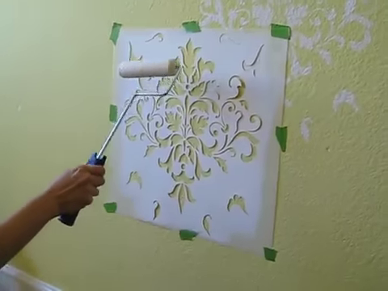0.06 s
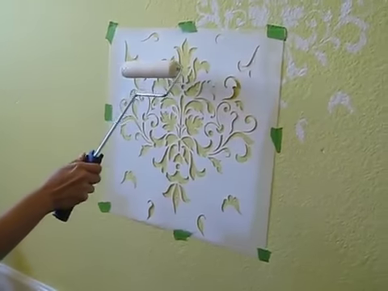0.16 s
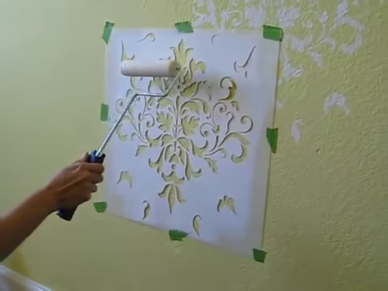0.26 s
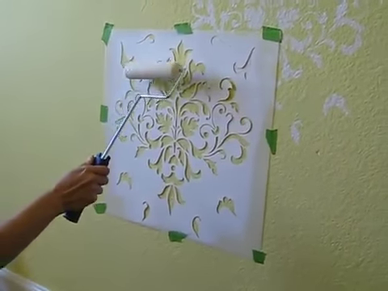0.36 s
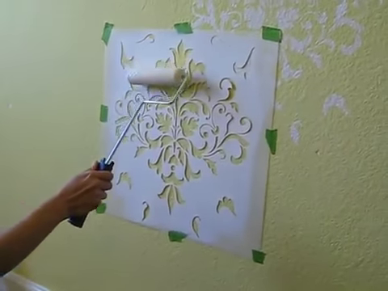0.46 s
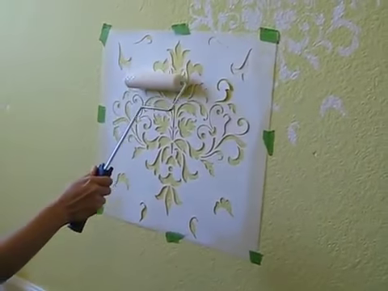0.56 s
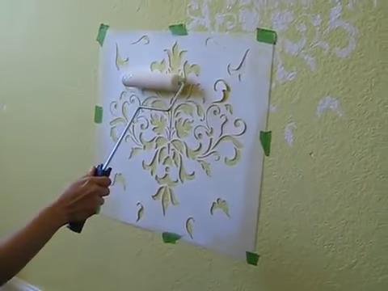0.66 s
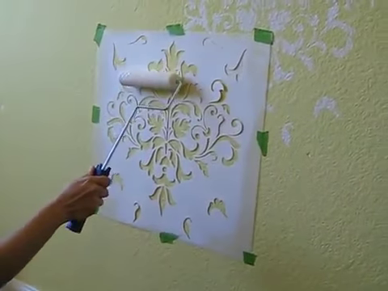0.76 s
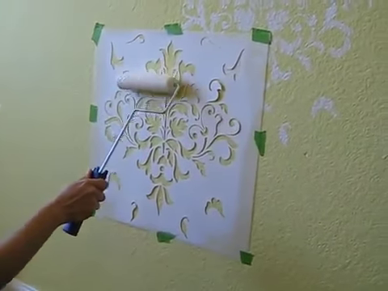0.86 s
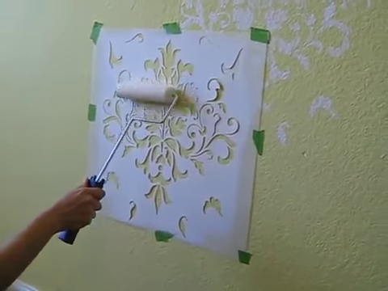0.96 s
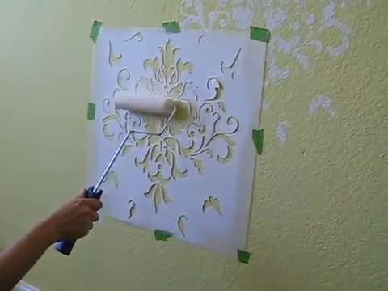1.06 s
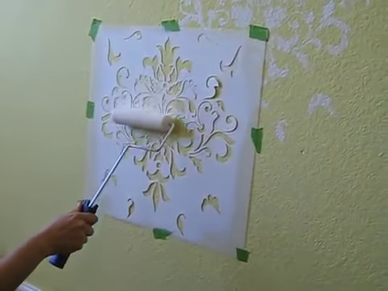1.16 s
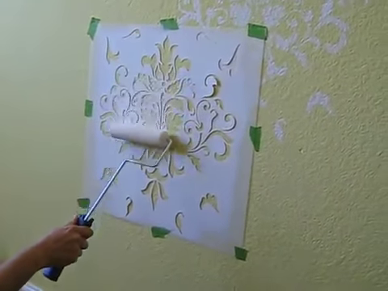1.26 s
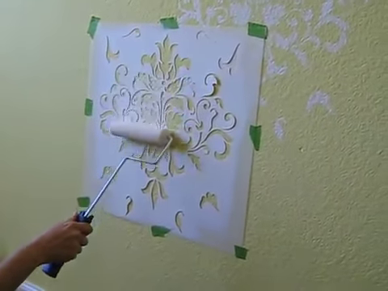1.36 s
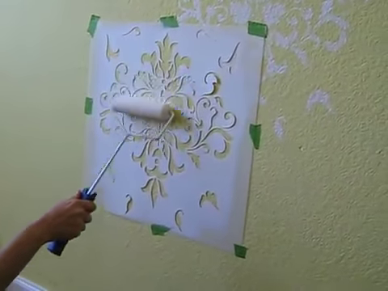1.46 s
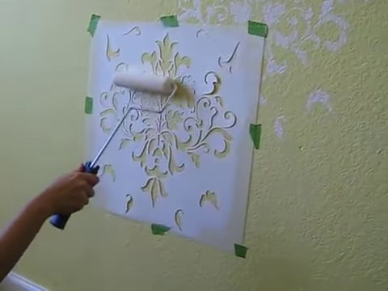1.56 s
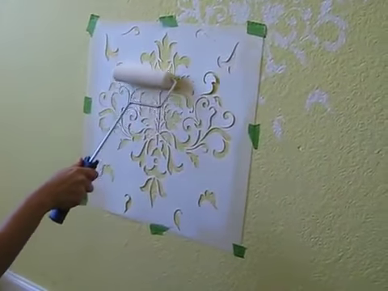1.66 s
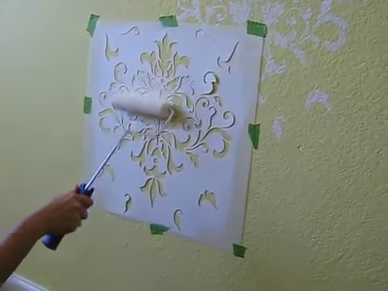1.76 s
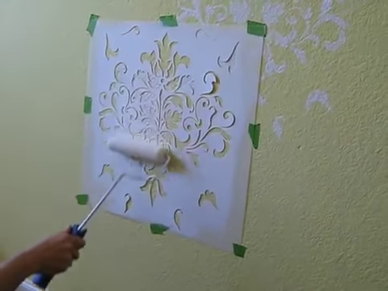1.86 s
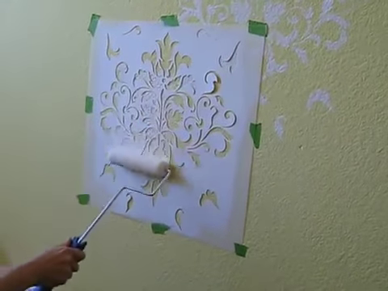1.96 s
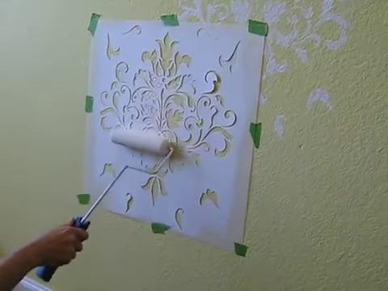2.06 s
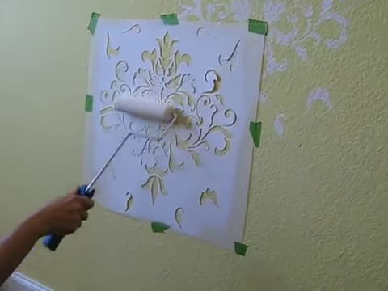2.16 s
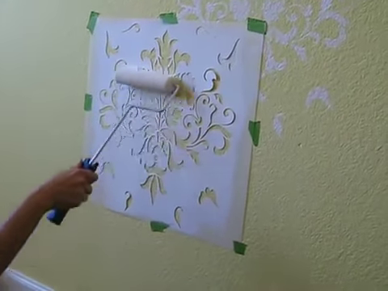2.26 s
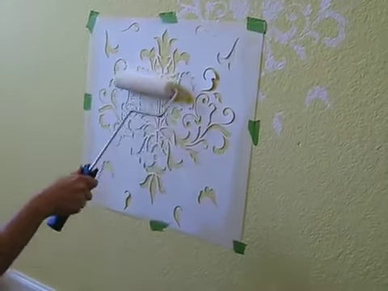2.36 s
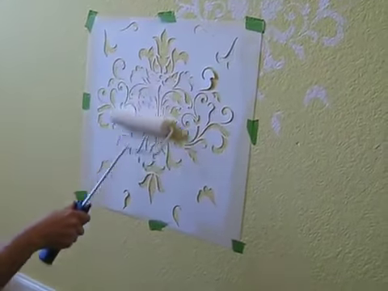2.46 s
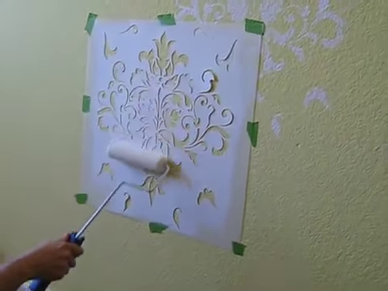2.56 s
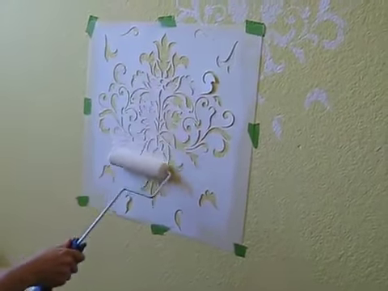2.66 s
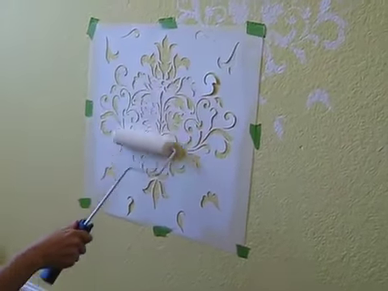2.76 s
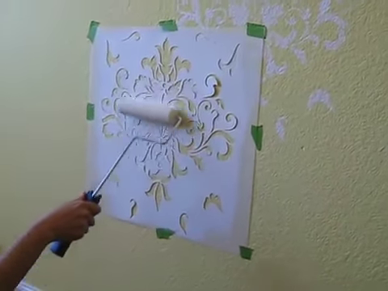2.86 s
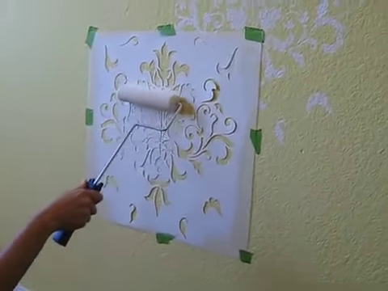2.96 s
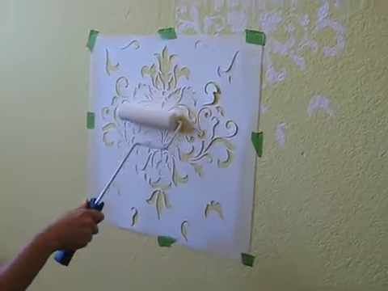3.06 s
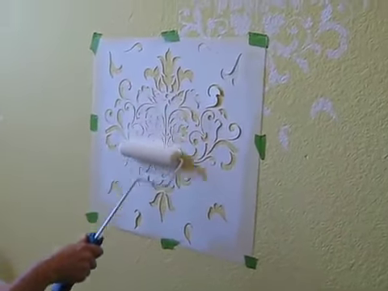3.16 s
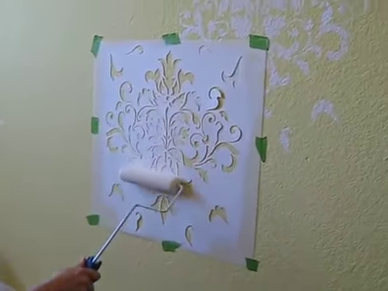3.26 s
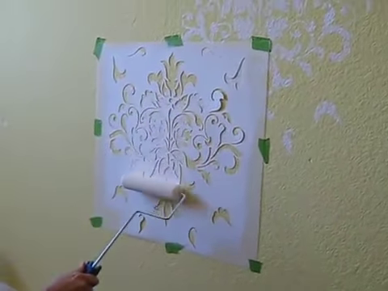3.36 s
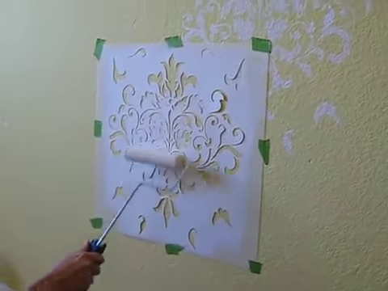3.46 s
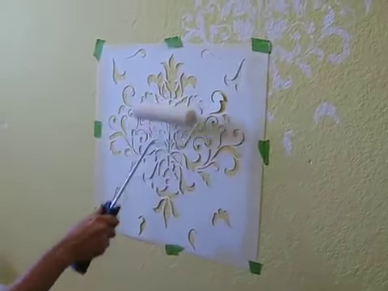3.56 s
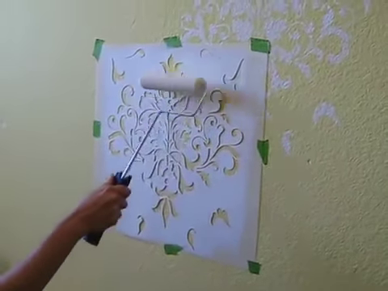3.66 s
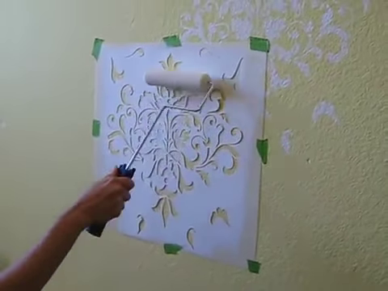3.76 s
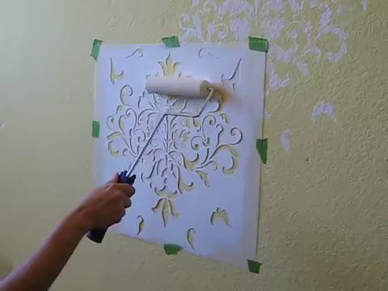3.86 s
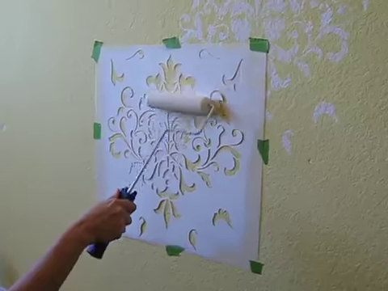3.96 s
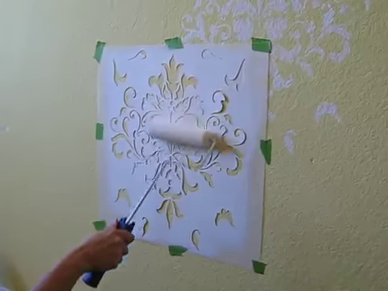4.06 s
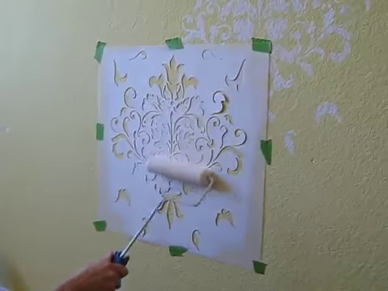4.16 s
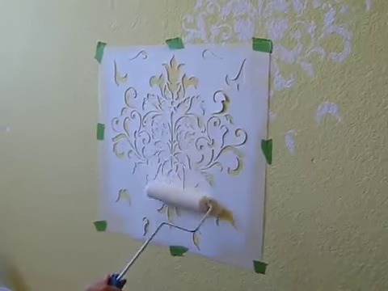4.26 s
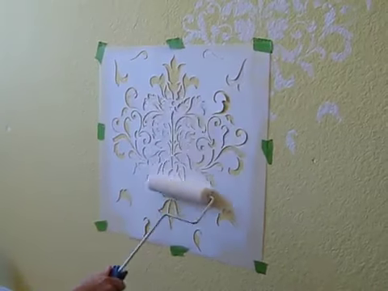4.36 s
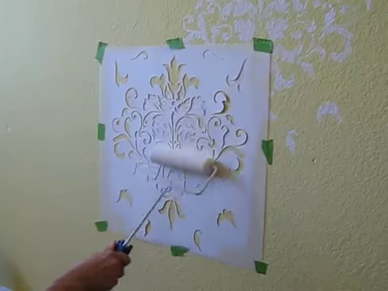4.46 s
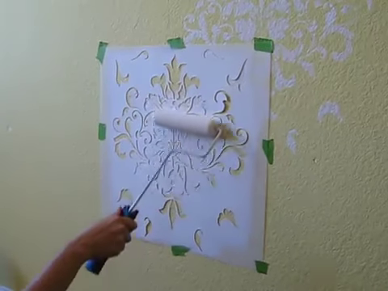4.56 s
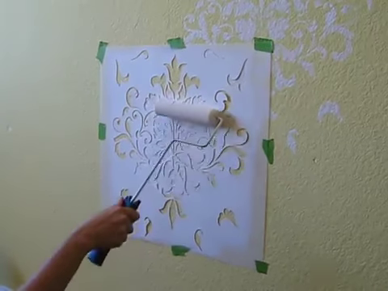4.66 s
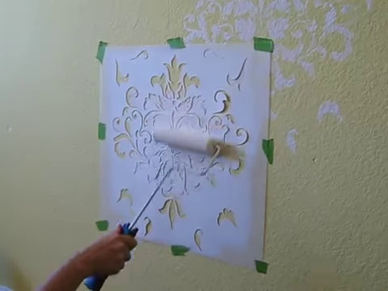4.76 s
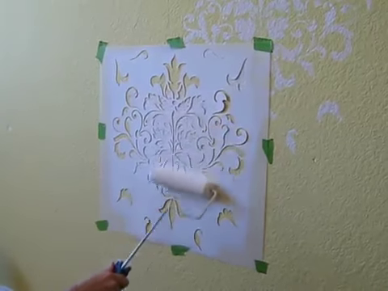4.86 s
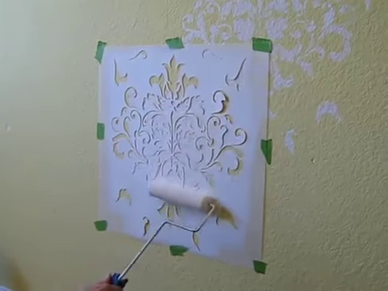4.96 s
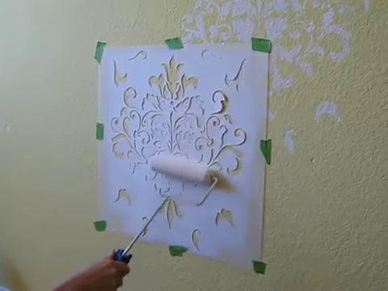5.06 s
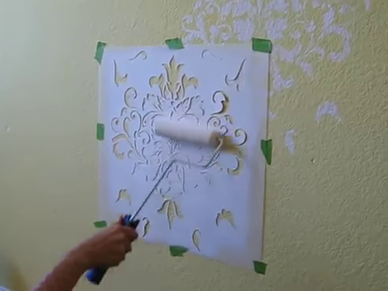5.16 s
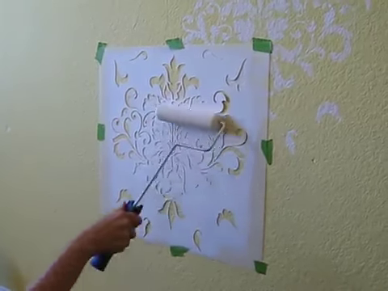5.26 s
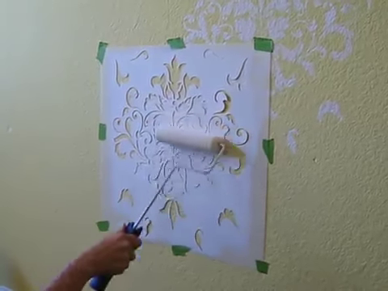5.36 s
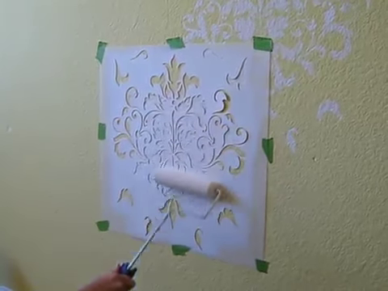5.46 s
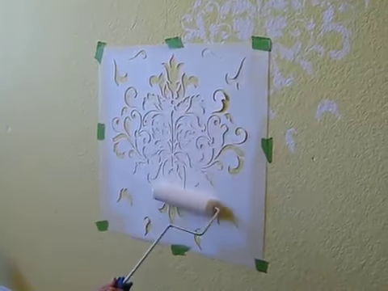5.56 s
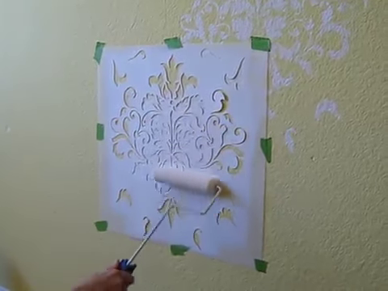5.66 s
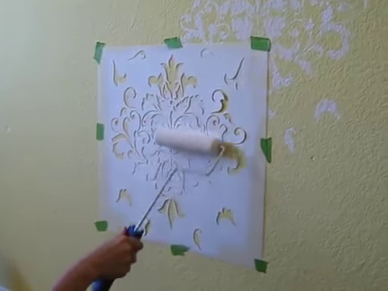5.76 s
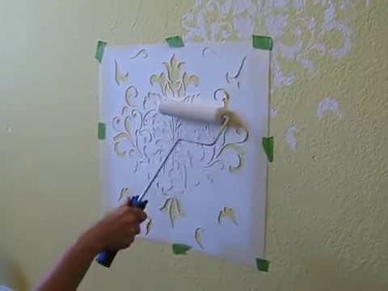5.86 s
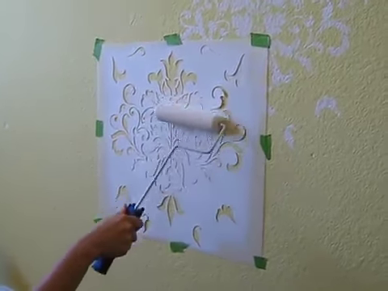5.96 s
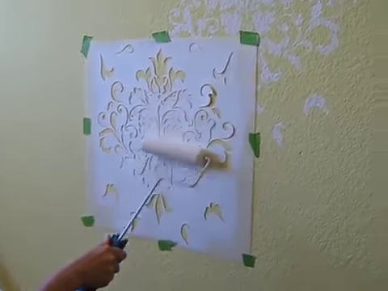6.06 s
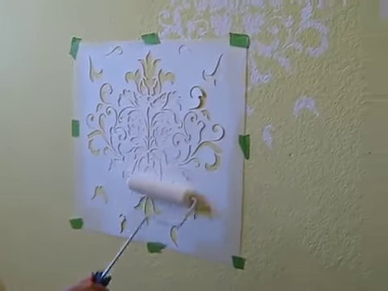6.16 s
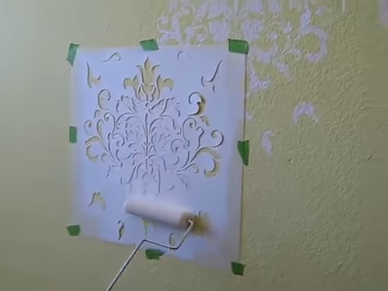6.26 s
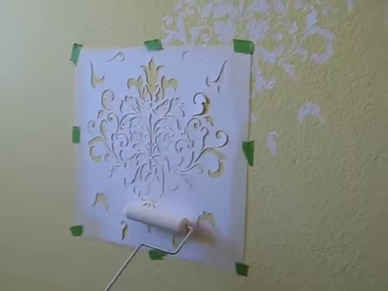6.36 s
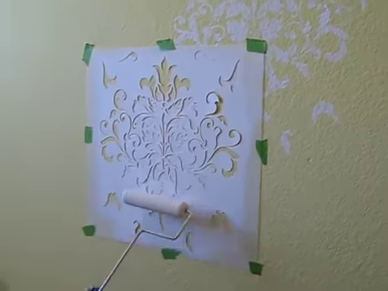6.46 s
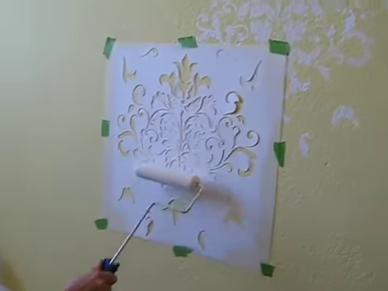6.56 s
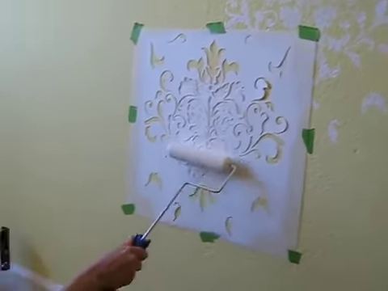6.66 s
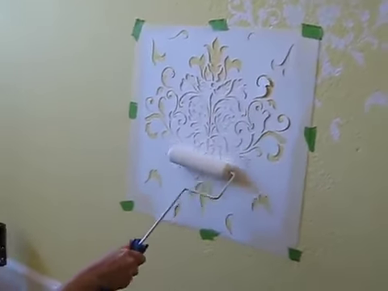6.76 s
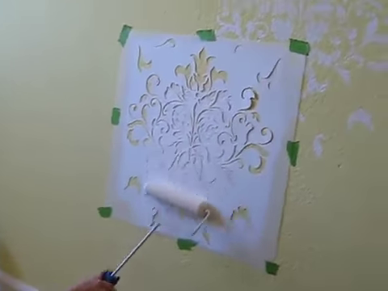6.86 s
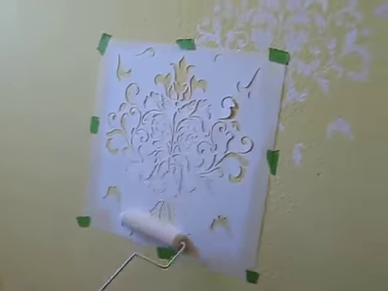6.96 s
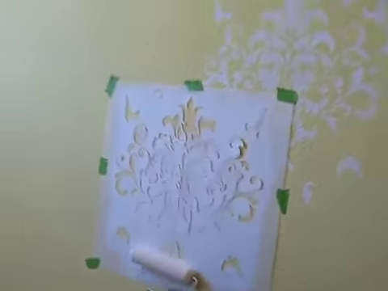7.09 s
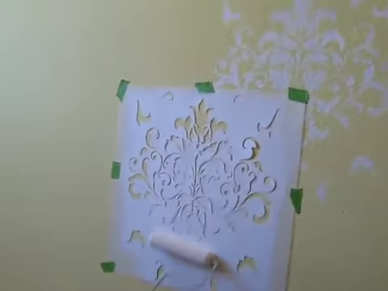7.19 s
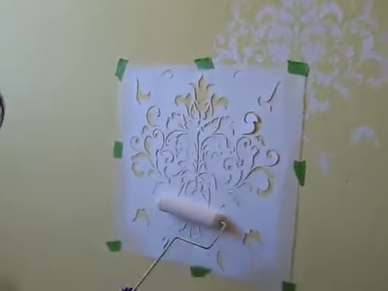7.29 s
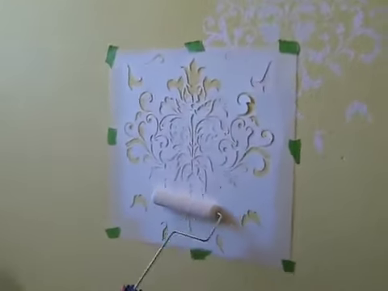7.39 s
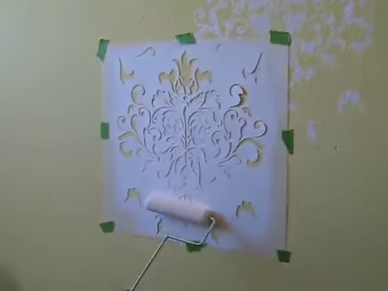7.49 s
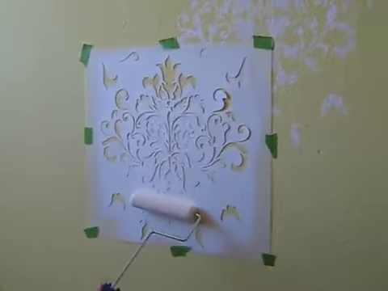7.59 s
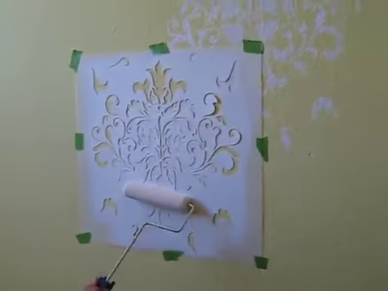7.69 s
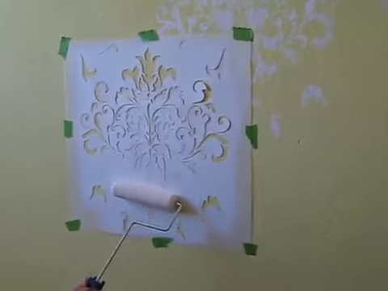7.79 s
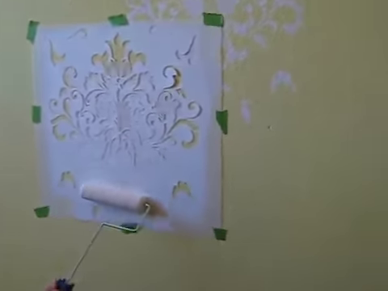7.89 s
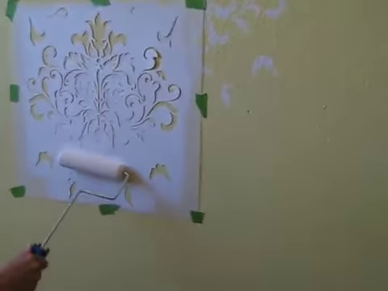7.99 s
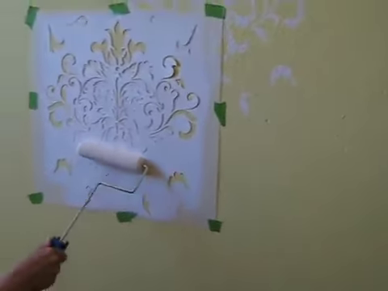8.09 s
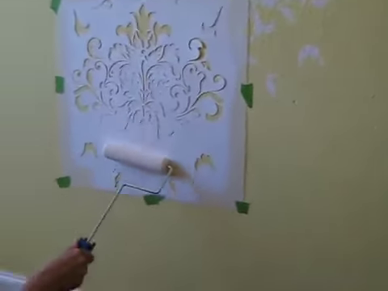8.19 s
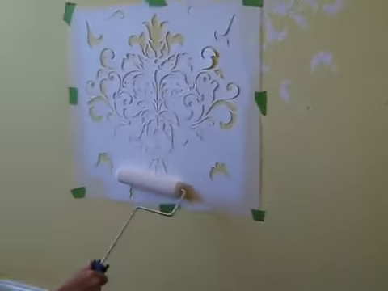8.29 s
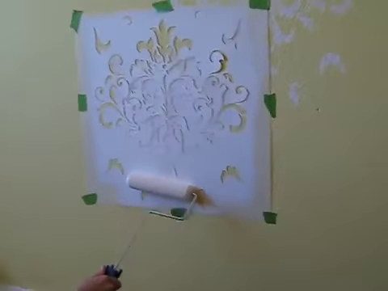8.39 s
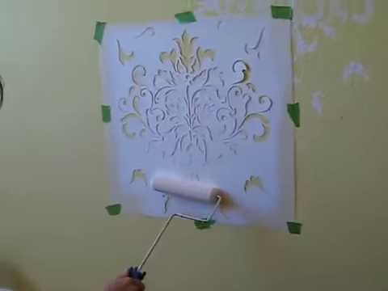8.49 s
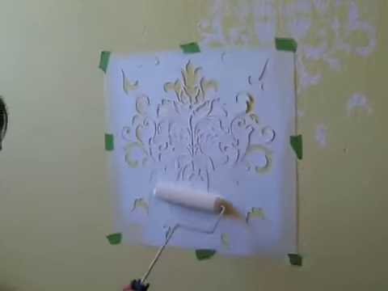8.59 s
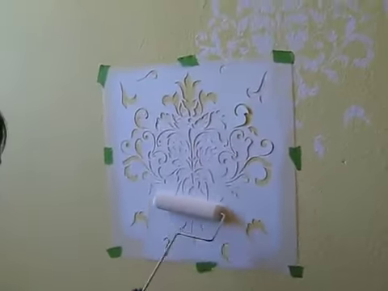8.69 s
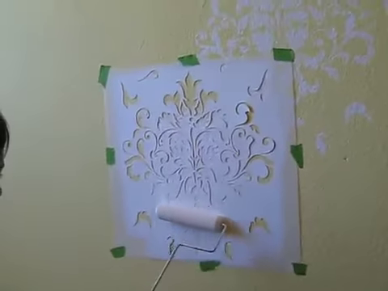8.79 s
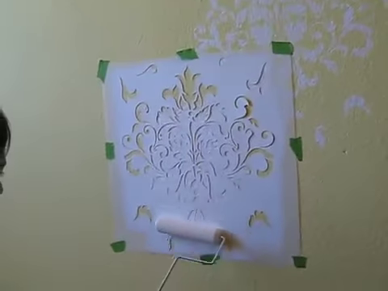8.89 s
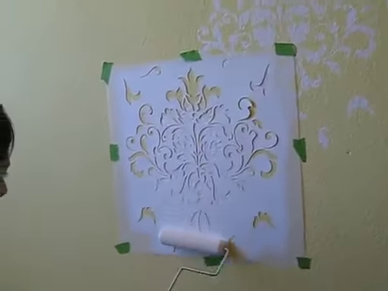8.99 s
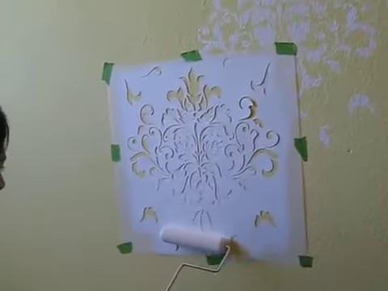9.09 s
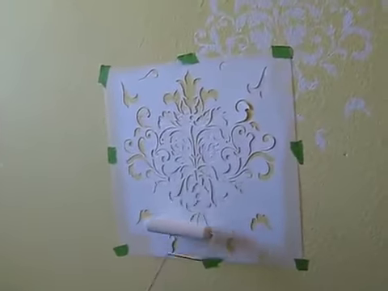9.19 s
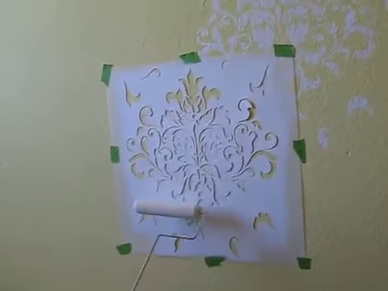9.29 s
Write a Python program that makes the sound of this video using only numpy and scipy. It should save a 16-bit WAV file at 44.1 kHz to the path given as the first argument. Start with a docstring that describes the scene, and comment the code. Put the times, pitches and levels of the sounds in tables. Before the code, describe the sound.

A wet foam paint roller runs up and down a plastic stencil on a wall. It starts faintly, then settles into quick, even strokes, each a sticky, fizzing rasp. A little past the middle it pauses briefly and the hand-held recorder's plastic case gives a sharp click. The rolling resumes a bit softer, with fingers rubbing on the case, another sharp click and a few small ticks, over faint hiss.

```python
"""At a wall, where a foam roller wet with paint runs up and down a plastic stencil. Each stroke is a swell of
tiny sticky pops, with the wall and sheet drumming softly underneath. The hand-held recorder adds hiss and a
faint hum; the roller landing at 3.8 s leaves a short rattle, and later fingers rub on its plastic case and make
it click. One microphone with a deep notch in the treble feeds both channels."""
import sys
import numpy as np
from scipy import signal
from scipy.fft import rfft, irfft, next_fast_len
from scipy.io import wavfile

SR = 44100
rng = np.random.default_rng(int(sys.argv[2]) if len(sys.argv) > 2 else 0)


def to_wav(sig):
    """Store sig (one row per channel, or 1-D mono) as 16-bit WAV at the path in sys.argv[1].

    Samples outside -1..1 are clipped; the rate is SR.
    """
    pcm = np.clip(np.atleast_2d(sig), -1, 1) * 32767
    pcm = np.round(pcm).astype(np.int16)
    wavfile.write(sys.argv[1], SR, pcm.T)  # frames by channels


N = 411453

# modes of the recorder's plastic case in five groups, low to high: pitch_hz, width_hz, level_db
CASE_MODES = [
    [(620, 250, -16.5), (1157, 224, -3), (1373, 194, 0), (1710, 190, -1)],
    [(2240, 254, -0.5), (2840, 460, -2)],
    [(3350, 260, -4), (3707, 168, 0.5), (4084, 190, -4.5)],
    [(4540, 300, -1), (5080, 400, 0), (5900, 600, -14)],
    [(6550, 890, -7.5), (9800, 920, 2.5), (12440, 1500, -1), (14000, 1300, 1)],
]


def from_db(db):
    """Decibels to amplitude."""
    return 10 ** (np.asarray(db) / 20)


def rms_one(x):
    """Scales x to rms 1."""
    return x / np.sqrt(np.mean(x ** 2) + 1e-20)


def drift(rate_hz):
    """Random wander: noise through a double one-pole low-pass; rms 1."""
    r = np.exp(-2 * np.pi * rate_hz / SR)
    return rms_one(signal.lfilter([1], [1, -2 * r, r * r], rng.standard_normal(N + SR))[SR:])


def coloured(x, spectrum):
    """Filters x by a curve of (freq_hz, level_db) points; rms 1."""
    size = next_fast_len(N)
    hz, level_db = np.transpose(spectrum)
    log_hz = np.log(np.maximum(np.arange(size // 2 + 1) * SR / size, 1))
    gain = from_db(np.interp(log_hz, np.log(hz), level_db))
    return rms_one(irfft(rfft(x, size) * gain, size)[:N])


def resonate(x, modes):
    """Parallel resonances with alternating signs; rms 1."""
    out = 0
    for k, (hz, width_hz, level_db) in enumerate(modes):
        r = np.exp(-np.pi * width_hz / SR)
        b = (1 - r * r) / 2 * np.array([1, 0, -1])
        a = [1, -2 * r * np.cos(2 * np.pi * hz / SR), r * r]
        out = out + (-1) ** k * from_db(level_db) * signal.lfilter(b, a, x)
    return rms_one(out)


def pops(per_s, spread_db):
    """Random impulses of uneven size."""
    sizes = from_db(spread_db * np.minimum(rng.exponential(1, N), 5)) * rng.choice([-1, 1], N)
    return sizes * (rng.random(N) < per_s / SR)


def swell(peak_s, rise_s, fall_s, level_db):
    """Gain that climbs 25 dB to its peak and sinks again; silent outside."""
    corners_s = [peak_s - rise_s, peak_s, peak_s + fall_s]
    corners_db = [level_db - 25, level_db, level_db - 25]
    return from_db(np.interp(np.arange(N) / SR, corners_s, corners_db, left=-200, right=-200))


def patchy(x, depth_db, rate_hz):
    """Half-octave bands swell and fade on their own."""
    edges_hz = 800 * 2 ** np.arange(0, 4.5, 1 / 2)
    size = next_fast_len(N)
    spectrum = rfft(x, size)
    band = np.searchsorted(edges_hz, np.arange(size // 2 + 1) * SR / size)
    return sum(irfft(spectrum * (band == k), size)[:N] * from_db(depth_db * drift(rate_hz))
               for k in range(len(edges_hz) + 1))


def recorder_hiss():
    """The recorder's own noise floor, wavering slightly."""
    # colour of the hiss: freq_hz, level_db
    hiss_spectrum = [(15, -51), (25, -4.5), (106, -8), (121, -6), (163, -4), (237, -5.5), (394, -7.5),
                     (856, -8), (1150, -7), (1580, -11), (5720, -16), (7890, -20), (15000, -24.5)]
    return from_db(-51.5 + 0.13 * drift(6.3)) * coloured(rng.standard_normal(N), hiss_spectrum)


def electrical_hum(pitch_hz=99.7):
    """A faint electrical hum whose overtones come and go."""
    # partials of the hum: harmonic, level_db
    partials = [(1, 1.5), (2, -13), (3, -8), (4, -6.5), (5, -6.5), (6, -10), (7, -5), (9, -6), (10, -3.5),
                (13, -2.5)]
    # slow rise and fall of the whole hum: time_s, gain_db
    contour = [(0.0, -76), (0.23, -65), (0.28, -76), (0.72, -62), (0.8, -76), (1.06, -64.5), (2.21, -64),
               (2.41, -71.5), (6.05, -67), (6.21, -75), (6.78, -64.5), (6.99, -76), (7.04, -63),
               (7.59, -73), (7.64, -63), (8.91, -67), (8.96, -63), (9.33, -64.5)]
    cycles = np.cumsum(pitch_hz * (1 + 0.00589 * drift(2.95))) / SR
    hum = sum(from_db(level_db + 3.1 * drift(3.1)) * np.sin(2 * np.pi * (k * cycles + rng.random()))
              for k, level_db in partials)
    return from_db(np.interp(np.arange(N) / SR, *np.transpose(contour))) * hum


def grip_shuffle():
    """The grip on the recorder shifts with a low, woolly noise."""
    # shifts of the hand: peak_s, rise_s, fall_s, level_db
    shifts = [(1.814, .06, 0.31, -49), (8.88, 0.17, 0.39, -44)]
    # colour of the shuffle: freq_hz, level_db
    woolly = [(80, -54), (170, -6), (500, -6), (1100, -6), (2500, -23)]
    return sum(swell(*shift) for shift in shifts) * coloured(rng.standard_normal(N), woolly)


def soft_thumps(attack_s=0.012, t60_s=0.11):
    """Thumps come through the hand and wall, each a low tone that swells softly and dies."""
    # low thumps: start_s, level_db, pitch_hz
    thumps = [(0.228, -50, 76), (1.839, -49, 170), (1.979, -55, 93), (2.519, -50, 190), (2.639, -51, 129),
              (2.859, -51.5, 275), (4.079, -52, 82.5), (4.859, -50, 158), (5.129, -56, 86.1),
              (5.976, -54, 88.8), (6.739, -48, 83), (9.1, -58, 260)]
    t = np.arange(SR // 2) / SR
    envelope = (1 - np.exp(-t / attack_s)) * from_db(-60 * t / t60_s)
    envelope /= envelope.max()
    out = np.zeros(N + len(t))
    for start_s, level_db, pitch_hz in thumps:
        at = round(start_s * SR)
        tone = np.sin(2 * np.pi * (pitch_hz * t + rng.random()))
        out[at:at + len(t)] += from_db(level_db) * envelope * tone
    return out[:N]


def rubs_and_landing_tail():
    """Skin sticks and slips on the case, feeding its modes in clumps, most of all the nearest group; first, the
    roller's landing leaves a short rattling tail."""
    # finger slides, the first row the tail of the roller landing: peak_s, rise_s, fall_s, level_db,
    # nearest_group (0-4), loss_db (per group away)
    rubs = [(3.845, .004, 0.11, -49, 3.4, 5), (6.545, .003, 0.11, -35, 2.15, 10),
            (6.547, .003, 0.064, -36, 3.0, 13), (6.546, .003, 0.1, -43, 4.0, 6),
            (6.705, .003, 0.055, -44, 3.7, 5), (6.712, .01, .06, -47, 0.2, 5.5),
            (6.75, .03, .03, -57, 2.5, 3), (6.91, .05, .12, -56, 1.9, 3), (6.95, .03, 0.033, -47, 2.2, 5),
            (6.976, .03, .03, -40.5, 0.67, 2), (7.1, .3, .3, -53, 1.4, 2.5),
            (7.294, .1, 0.071, -48.5, 0.8, 4), (7.34, 0.09, 0.075, -50, 2.3, 10),
            (7.4, 0.17, 0.28, -44, 2.7, 8), (7.73, .2, 0.17, -47, 2.1, 7),
            (7.91, 0.068, 0.51, -44.5, 0.44, 5), (8.05, 0.16, 0.2, -36, 0.9, 4.5),
            (8.183, 0.032, 0.0044, -33, 1.2, 4.5), (8.212, 0.035, 0.0068, -32.5, 1.1, 4),
            (8.235, .004, 0.026, -39, 0.4, 5), (8.328, 0.088, 0.065, -48, 0.4, 4),
            (8.446, .03, .04, -55, 2.3, 3)]
    # how readily each mode group answers a rub: gain_db
    response_db = [0.3, -4.5, 0.5, -4, -2]
    groups = np.arange(len(CASE_MODES))
    gains = sum(np.outer(from_db(response_db - loss_db * np.abs(groups - nearest_group)), swell(*shape))
                for *shape, nearest_group, loss_db in rubs)
    slips = pops(6000, spread_db=-0.5) * from_db(1.6 * drift(79.0))
    return sum(gain * resonate(slips, modes) for gain, modes in zip(gains, CASE_MODES))


def case_clicks(grit_t60_s=0.0066, grip_damping=1.48):
    """A sharp edge with a short gritty trail strikes the case modes, which the grip widens."""
    # clicks of the case: start_s, level_db, struck_group (0-3), loss_db (per group away), top_group_db
    clicks = [(1.5127, -35, 3.1, 8, -29), (3.8427, -46, 1.9, 3, -32), (6.5367, -3.5, 2.65, 8, -10),
              (6.575, -24, 2.2, 15, -34), (6.6757, -36, 2.1, 10, -51), (6.7013, -36, 2.4, 2.5, -27),
              (6.7158, -40, 0.1, 5, -46), (8.186, -6, 1.59, 10, -23), (8.2053, -23, 1.4, 4, -26),
              (8.2287, -19, 1.17, 7, -27), (8.2821, -34, 1.8, 6, -44), (8.6344, -35, 1.1, 3.5, -43),
              (8.7973, -29.5, 1.2, 5, -43), (8.831, -31.5, 1.6, 6, -43), (9.0108, -32, 1.3, 4.5, -47),
              (9.2078, -33, 1.3, 7, -58), (9.2124, -36, 1.6, 4, -58), (9.2573, -20.5, 1.02, 9.5, -54)]
    # how readily each of the four lower mode groups answers a click: gain_db
    response_db = np.array([2.1, -1.5, -0.1, -0.5])
    groups = np.arange(len(response_db))
    t = np.arange(2048) / SR
    out = np.zeros(N + len(t))
    for start_s, level_db, struck_group, loss_db, top_group_db in clicks:
        snap = 0.61 * rng.standard_normal(len(t)) * from_db(-60 * t / grit_t60_s)
        snap[0] = 1   # the sharp edge
        at = round(start_s * SR)
        body_db = level_db + response_db - loss_db * np.abs(groups - struck_group)
        for peak_db, modes in zip((*body_db, top_group_db), CASE_MODES):
            ring = resonate(snap, np.array(modes) * [1, grip_damping, 1])
            out[at:at + len(t)] += from_db(peak_db) * ring / np.max(np.abs(ring))
    return out[:N]


def arm_strokes():
    """Gains of fizz and rasp follow the arm's speed on a sine arc; strokes and surges add in power."""
    # roller strokes: start_s, length_s, level_db, rise_share (0-1), rasp_db (relative to the fizz)
    strokes = [(-0.027, 0.25, -57.856, 0.75, 3), (0.171, 0.24, -60, 0.39, 3), (0.828, 0.55, -52, 0.8, 0.5),
               (1.377, 0.33, -44, 0.52, 0), (1.697, 0.34, -41.5, 0.57, -1), (1.999, 0.387, -40, 0.53, -1),
               (2.362, 0.35, -38.5, 0.47, -2.0), (2.692, 0.36, -39, 0.45, -1),
               (3.022, 0.4, -39, 0.46, -2.0), (3.95, 0.43, -40, 0.55, -3), (4.343, 0.37, -37.5, 0.64, -3.5),
               (4.695, 0.33, -37, 0.57, -3), (4.98, 0.36, -36.435, 0.55, -3.5),
               (5.31, 0.32, -37, 0.57, -2.5), (5.605, 0.37, -36, 0.57, -3.5), (5.947, 0.42, -37, 0.45, -3),
               (6.757, 0.359, -41.5, 0.31, -2.0), (7.034, 0.362, -44, 0.7, -2.0),
               (7.352, 0.23, -42, 0.38, -2.0), (7.561, 0.22, -42.5, 0.615, -1.5),
               (7.767, 0.19, -40.5, 0.505, -1.5), (7.934, 0.23, -42, 0.68, -1.5),
               (8.143, 0.247, -40, 0.35, -2.0), (8.462, 0.28, -42, 0.57, -1.5),
               (8.722, 0.37, -42, 0.44, -2.5), (9.073, 0.15, -50, 0.65, 0.5)]
    # sticky surges within a stroke: peak_s, rise_s, fall_s, level_db
    surges = [(1.018, .05, .08, -52), (1.277, .05, .05, -54), (1.52, .04, .1, -48), (1.836, .06, .08, -44),
              (2.06, .03, .1, -44), (4.764, .04, .08, -44), (5.657, .03, .08, -45), (7.029, .08, .04, -47),
              (8.675, .06, .05, -50)]
    t = np.arange(N) / SR
    fizz_power = sum(swell(*surge) for surge in surges) ** 2
    rasp_power = fizz_power.copy()
    for start_s, length_s, level_db, rise_share, rasp_db in strokes:
        fastest_s = start_s + rise_share * length_s
        speed = np.sin(np.pi / 2 * np.interp(t, [start_s, fastest_s, start_s + length_s], [0, 1, 0]))
        drive = speed ** np.where(t < fastest_s, 0.91, 1)   # the paint grabs at once: a quicker rise
        fizz_power += (from_db(level_db) * drive ** 1.14) ** 2
        rasp_power += (from_db(level_db + rasp_db) * drive) ** 2
    return np.sqrt(fizz_power), np.sqrt(rasp_power)


def paint_roller():
    """Paint threads snap behind the foam by the thousand; the stencil's cut-outs make it uneven."""
    # colour of the fine fizz: freq_hz, level_db
    fizz_spectrum = [(6000, -21.5), (8600, -2), (10000, 0), (13800, 0.5), (15500, -0.5)]
    # colour of the coarser rasp: freq_hz, level_db
    rasp_spectrum = [(500, -34), (1200, -20), (2000, -12), (3000, -5.5), (4500, -2), (6000, -1), (8000, -4),
                     (10000, -12.5)]
    # wall and sheet drumming under the roller: pitch_hz, width_hz, level_db
    wall_modes = [(75, 33, -2.5), (157, 47, -3.5), (263, 51, -5), (782, 93, 0.5)]
    fizz_gain, rasp_gain = arm_strokes()
    uneven = drift(31.0)
    fizz = coloured(pops(30000, spread_db=3.0), fizz_spectrum) * fizz_gain * from_db(0.74 * uneven)
    rasp = coloured(pops(25000, spread_db=2.5), rasp_spectrum) * rasp_gain * from_db(0.5 * uneven)
    drum_gain = fizz_gain * from_db(-20.5 + 1.3 * drift(4.8))
    paint = patchy(fizz + rasp, depth_db=1.06, rate_hz=17.0)
    return paint + resonate(rng.standard_normal(N), wall_modes) * drum_gain


def scene():
    """Roller, handling noise and noise floor share one microphone, sent to both channels."""
    handling = rubs_and_landing_tail() + case_clicks() + soft_thumps() + grip_shuffle()
    mono = paint_roller() + handling + recorder_hiss() + electrical_hum()
    return np.tile(mono, (2, 1))


def record(dry, notch_hz=7887, cutoff_hz=15080):
    """The microphone has a wide treble notch with a narrower one inside it; the top is cut steeply."""
    for width_hz in (1580, 300):
        dry = signal.lfilter(*signal.iirnotch(notch_hz, notch_hz / width_hz, SR), dry)
    return signal.sosfilt(signal.cheby2(36, 60, cutoff_hz, fs=SR, output="sos"), dry)


dry = scene()
out = record(dry)
to_wav(out)
```